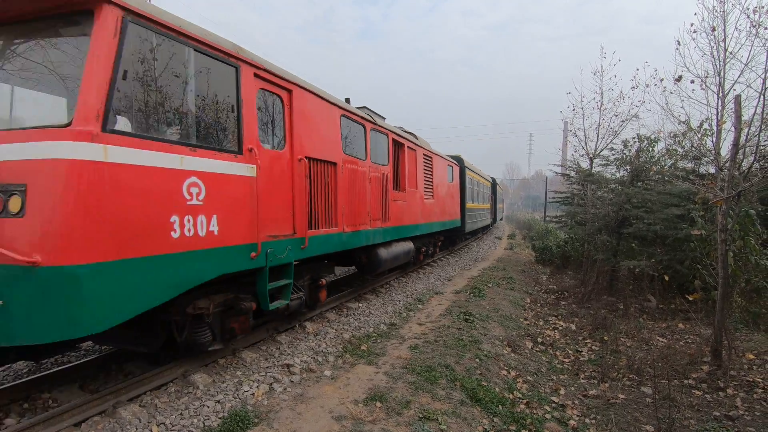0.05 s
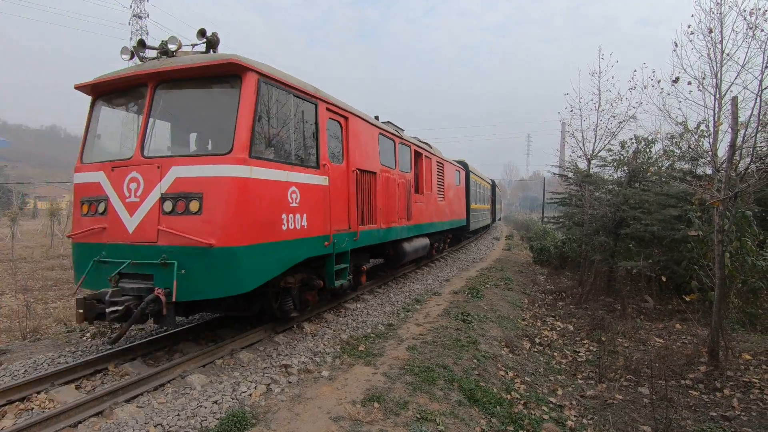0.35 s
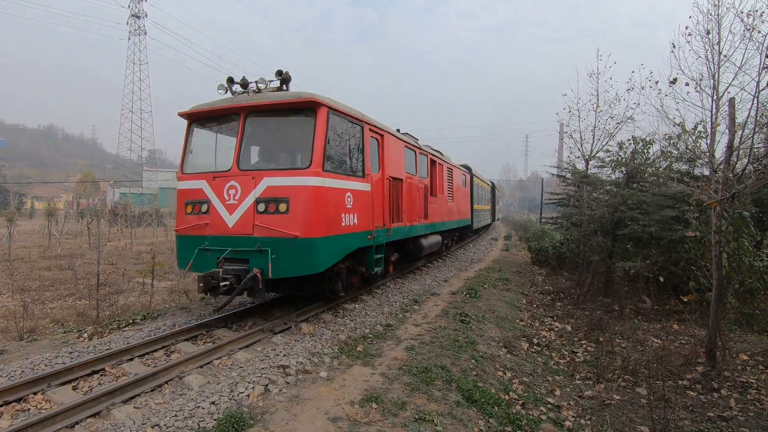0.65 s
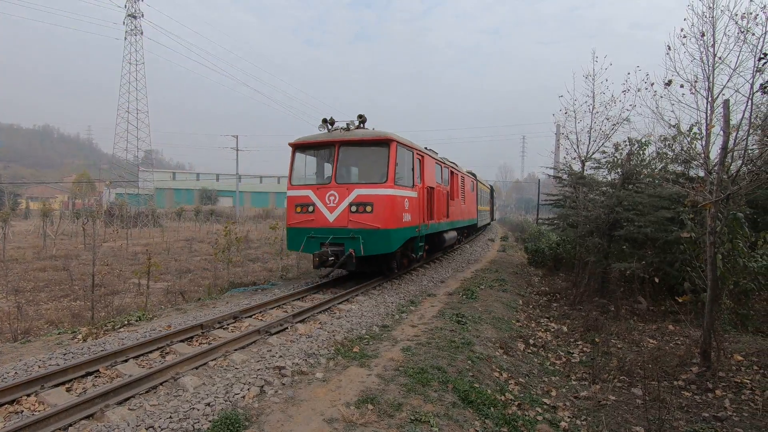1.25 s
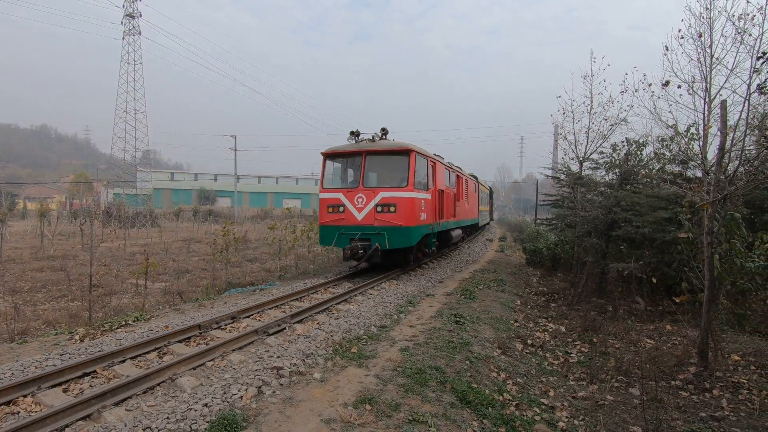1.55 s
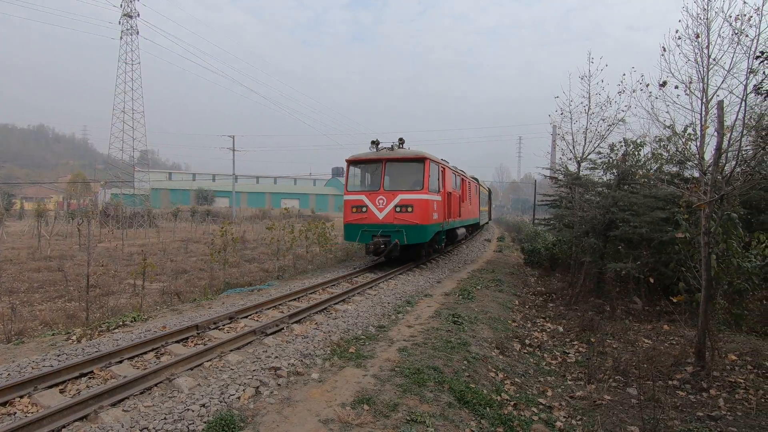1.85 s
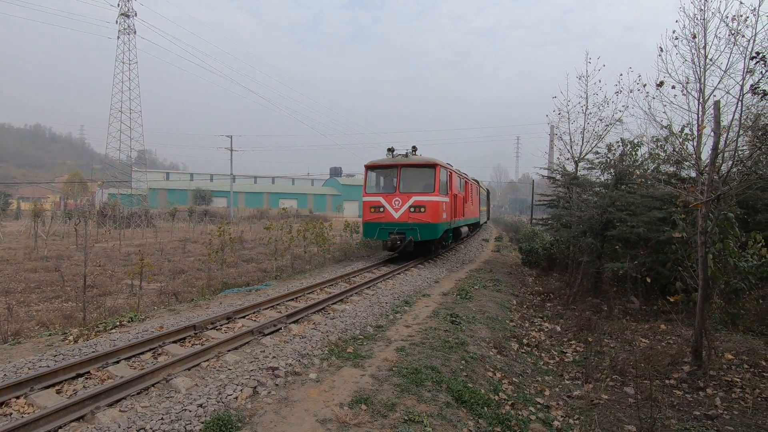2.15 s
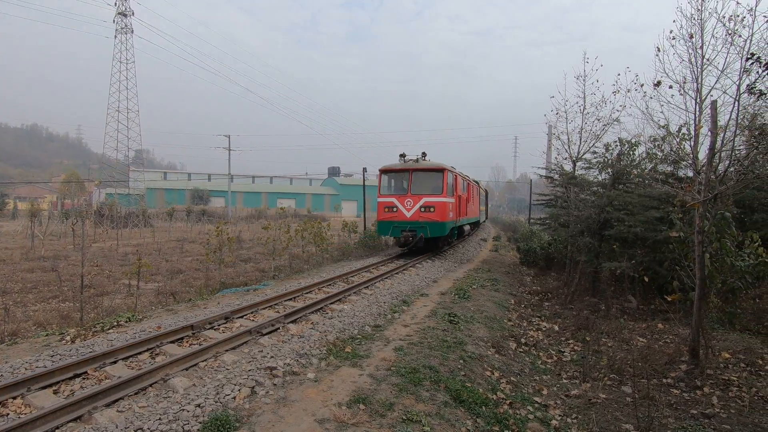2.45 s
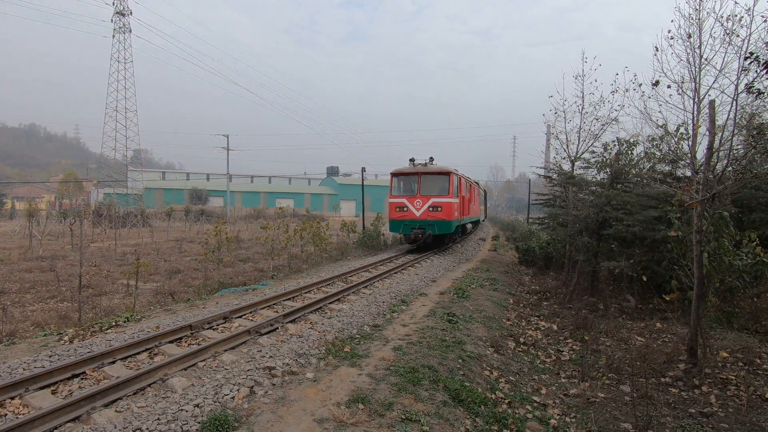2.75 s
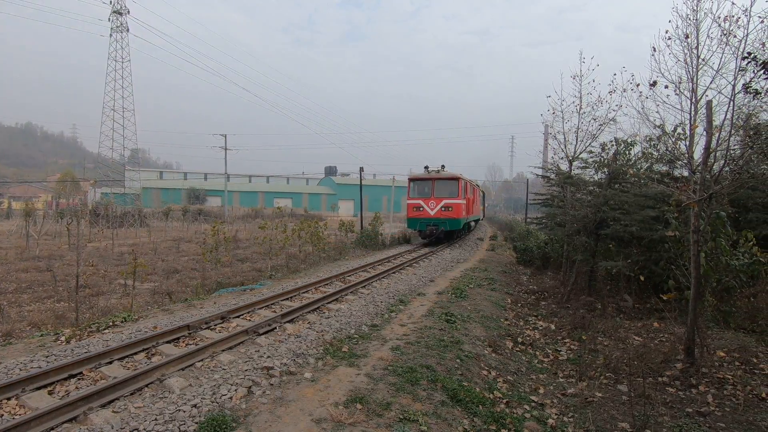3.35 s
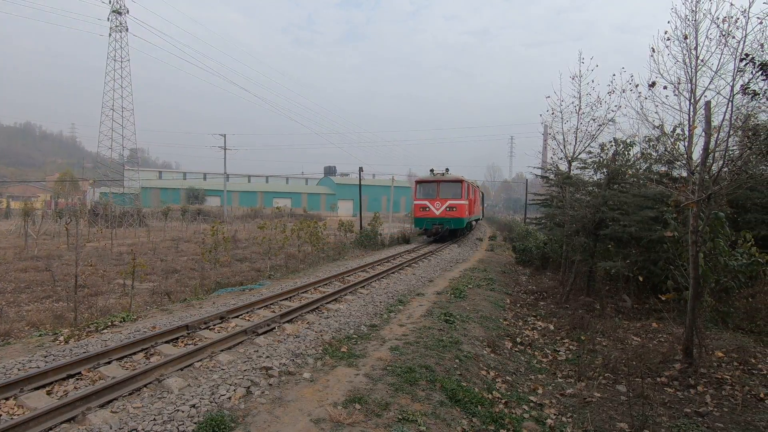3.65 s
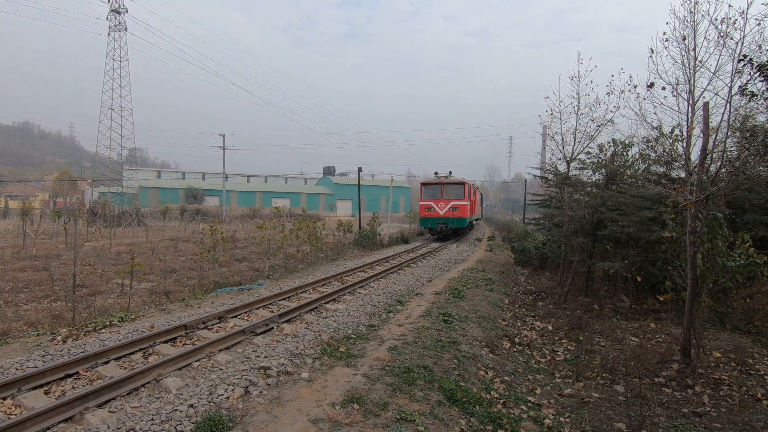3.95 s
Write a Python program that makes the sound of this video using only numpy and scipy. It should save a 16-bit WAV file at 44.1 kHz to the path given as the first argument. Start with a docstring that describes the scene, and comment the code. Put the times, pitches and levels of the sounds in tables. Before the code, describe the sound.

A diesel train rumbles and drones along a track, slowly fading as it moves away.

```python
"""A diesel locomotive backs its coaches away along a track in open country.
Its twelve cylinders fire in turn, so the exhaust drones and the engine clatters, with a few low booms.
Under it the running gear rumbles, and the roar and hiss of wheels on uneven rails fade with distance.
A wheel clanks over a rail joint, wheels rub the rail and sing briefly, and rubbing steel gives
a few faint, very high squeaks."""
import sys
import numpy as np
from scipy import signal
from scipy.fft import rfft, irfft
from scipy.io import wavfile

SR = 44100
rng = np.random.default_rng(int(sys.argv[2]) if len(sys.argv) > 2 else 0)


def master(y):
    """Save y as 16-bit WAV."""
    cut = np.clip(np.atleast_2d(y).T, -1, 1)
    pcm = np.round(cut * 32767)  # scale
    wavfile.write(sys.argv[1], SR, pcm.astype(np.int16))


N = 176400
TIME, FREQS = np.arange(N) / SR, np.fft.rfftfreq(N, 1 / SR)
CYLINDERS = 12


def exhaust(firings):
    """The exhaust drones: low, wavering tones that follow the engine's speed."""
    # For each tone: its vibrations per engine cycle (twelve firings), and its level in dB.
    orders = [9, 12, 18, 26, 28, 32]
    levels_db = [-32.5, -23, -34.5, -39, -37.5, -49.5]
    cycles = firings / CYLINDERS
    waver_db, out = 1.6, 0
    for order, db in zip(orders, levels_db):
        gain = from_db(db + waver_db * drift(2.5))
        out += np.sqrt(2) * gain * np.sin(2 * np.pi * (order * cycles + rng.random()))
    return out


def engine_clatter(firings):
    """Each cylinder repeats its own short knock once a cycle, and the knocks ring the engine's casing."""
    # How strong the cylinders' knocks are against each other, in dB, in firing order.
    cylinder_db = [5.5, -2, -2.5, 2.5, 3.5, 3, 5.5, 3.5, 2, 5, -2, -4.5]
    # The tone of the clatter. Each row: frequency in Hz, relative level in dB.
    spectrum = [(100, -20), (200, 3), (310, -2), (430, 0.5), (570, 1.5), (650, -3.5), (1000, -6.5),
                (1400, -11.5), (2400, -12.5), (3500, -39), (9000, -62)]
    # The casing's ring. Each row: pitch in Hz, width in Hz, level in dB against the clatter.
    casing = [(428.7, 85, -12), (512, 34, -11), (702, 11.5, -14.5)]
    fade_s, jitter_s, scatter_db = .091, .00012, .8
    fade = from_db(-60 * TIME[:SR // 10] / fade_s)
    knocks = rng.standard_normal((CYLINDERS, 2, len(fade))) * fade
    starts = np.flatnonzero(np.diff(np.floor(firings)))
    # No knock comes exactly on time or equally hard.
    late, harder = rng.standard_normal((N // 100, 2))[:len(starts)].T
    starts = np.clip(starts + (late * jitter_s * SR).astype(int), 0, N - 1)
    knocking = 0
    for cylinder, db in enumerate(cylinder_db):
        turns = slice(cylinder, None, CYLINDERS)
        clicks = np.zeros((1, N))
        clicks[0, starts[turns]] = from_db(db + scatter_db * harder[turns])
        knocking += signal.fftconvolve(clicks, knocks[cylinder], axes=1)[:, :N]
    ringing = sum(from_db(db) * resonate(knocking, hz, width) for hz, width, db in casing)
    return colour(knocking, spectrum) + ringing


def booms():
    """The locomotive gives brief low notes that swell and die, each with its octave."""
    # Each row: middle in seconds, length in seconds, pitch in Hz, level in dB, octave's level in dB.
    notes = [(0.272, 0.07, 185, -26.5, -38), (.62, .25, 118, -24, -42), (.76, 0.14, 180, -28, -33),
             (1.11, 0.3, 135, -22.5, -44)]
    out = 0
    for middle, length, hz, *levels in notes:
        for harmonic, db in enumerate(levels, 1):
            tone = np.sqrt(2) * np.sin(2 * np.pi * harmonic * hz * TIME)
            out += from_db(db) * swell(middle, length) * tone
    return out


def rolling(rumble_gain, roar_gain, hiss_gain):
    """Wheels roll on uneven rails: a deep rumble, a ringing roar and a hiss, all fluttering in level."""
    # The tone of each noise. Each row: frequency in Hz, relative level in dB.
    rumble_spectrum = [(12, -37), (22, -3.5), (35, -6), (62, 1), (85, -4), (110, -2), (135, -3.5),
                       (170, -10.5), (220, -19), (300, -27.5), (1200, -88)]
    roar_spectrum = [(100, -28), (260, 6.5), (480, 5.5), (680, 0), (1050, -1), (1700, -5.5), (2500, -8),
                     (3300, -15), (7000, -47), (12000, -68)]
    hiss_spectrum = [(1200, -21), (3000, 0.5), (4500, -0.5), (6300, 0.5), (7100, -6.5), (9000, -13),
                     (11000, -22.5), (13000, -28.5), (15500, -45)]
    rumble = noise(rumble_spectrum) * flutter(depth_db=.15, rate_hz=6)
    roar = noise(roar_spectrum) * flutter(depth_db=1, rate_hz=19) + wheel_ring()
    hiss = noise(hiss_spectrum) * flutter(depth_db=1, rate_hz=16)
    return rumble_gain * rumble + roar_gain * roar + hiss_gain * hiss


def wheel_ring():
    """Rolling wheels ring at a few pitches, each swelling and sinking on its own."""
    # Each row: pitch in Hz, width in Hz, level in dB against the roar.
    rings = [(1350, 23, -18), (1473, 75, -16), (1892, 120, -19.5), (3997, 260, -24)]
    return sum(from_db(db) * flutter(depth_db=1.5, rate_hz=13) * resonate(white(), hz, width)
               for hz, width, db in rings)


def nearest_wheels():
    """The nearest wheels make a bright rush that is soon too far away to hear."""
    # Each row: frequency in Hz, relative level in dB.
    spectrum = [(700, -36), (2200, -2), (2900, 2.5), (4000, -14), (12000, -38)]
    start_db, fade_db_per_s = -39.5, 11
    return from_db(start_db - fade_db_per_s * TIME) * noise(spectrum)


def rail_joint():
    """A wheel drops over a joint and bounces: the wheel clanks dully and the rail crashes brightly."""
    # Each row: start in seconds, clank level in dB, crash level in dB.
    blows = [(.436, -26, -42), (.451, -32, -35), (.47, -31, -43)]
    # The tone of each part. Each row: frequency in Hz, relative level in dB.
    clank_spectrum = [(200, 11.5), (950, 3), (2500, -8.5), (12000, -45)]
    crash_spectrum = [(800, -15), (2500, 0), (4800, 0), (15000, -42)]
    clank, crash = noise(clank_spectrum), noise(crash_spectrum)
    rise_s, fade_s, out = .003, .22, 0
    for start, clank_db, crash_db in blows:
        age = np.maximum(TIME - start, 0)
        envelope = np.minimum(age / rise_s, 1) * from_db(-60 * age / fade_s)
        out += envelope * (from_db(clank_db) * clank + from_db(crash_db) * crash)
    return out


def wheel_rubs():
    """A wheel rubs the rail and sings short, faint notes."""
    # Each row: middle in seconds, length in seconds, pitch in Hz, level in dB.
    notes = [(.86, .06, 1410, -40), (1.22, .22, 1997, -44), (1.44, .07, 1997, -45.5),
             (1.555, .045, 2006, -41.5), (2.275, .05, 1490, -41)]
    return sum(from_db(db) * swell(middle, length) * steel_tone(hz, wander_hz=26, rate_hz=70)
               for middle, length, hz, db in notes)


def squeaks():
    """Steel rubs in the running gear: thin chirps, each with a clashing overtone and a little rasp."""
    # Each row: middle and length in seconds, pitch in Hz, then tone, rasp and overtone levels in dB.
    chirps = [(.52, .13, 8880, -60, -62, -85), (.565, .11, 9780, -59.5, -63, -80),
              (1.985, .045, 9960, -59, -67, -77), (2.42, .11, 10980, -71, -63, -90),
              (2.492, .11, 8860, -63, -66, -90), (2.77, .075, 8840, -60, -68, -90),
              (3.67, .045, 9800, -63, -64, -82)]
    # Each row: frequency in Hz, relative level in dB.
    rasp_spectrum = [(4000, -29), (8800, 4), (11000, -3), (16000, -24)]
    rasp, out = noise(rasp_spectrum), 0
    for middle, length, hz, tone_db, rasp_db, overtone_db in chirps:
        tone, overtone = (steel_tone(f, wander_hz=65, rate_hz=160) for f in (hz, 1.42 * hz))
        chirp = from_db(tone_db) * tone + from_db(overtone_db) * overtone + from_db(rasp_db) * rasp
        out += swell(middle, length) * chirp
    return out


def steel_tone(hz, wander_hz, rate_hz):
    """A tone whose pitch trembles as steel sticks and slips."""
    pitch = hz + wander_hz * np.array([drift(rate_hz), drift(rate_hz)])
    return np.sqrt(2) * np.sin(2 * np.pi * np.cumsum(pitch, axis=1) / SR)


def microphones(sound):
    """Direct sound reaches two microphones alike, scattered sound with opposite signs."""
    # Each row: frequency in Hz, left minus right in dB, left's lead in radians, likeness from 0 to 1.
    left_and_right = [(200, -5, .08, .97), (430, -9.5, .25, .96), (590, -12, .8, .88),
                      (760, -7.5, 1.55, .88), (1050, -1.5, 1.4, .84), (2050, -2.5, .6, .78),
                      (2800, -7, 0, .55), (3120, -8, 1.7, .72), (4100, -6, 0, .77), (5100, -2, -1.4, .72),
                      (6100, -7, -2.2, .6), (7800, 4.5, -4.3, .58), (9400, 0, -6.4, .6)]
    balance_db, lead, alike = in_frequency(left_and_right)
    sides = np.array([[1], [-1]])
    direct, scattered = rfft(sound)
    pair = np.sqrt((1 + alike) / 2) * direct + sides * np.sqrt((1 - alike) / 2) * scattered
    # Their housing shades and delays one side against the other.
    shade = from_db(sides * balance_db / 2)
    pair *= shade / np.sqrt(np.mean(shade ** 2, axis=0))
    pair[0] *= np.exp(1j * lead)
    return irfft(pair, N)


def from_db(db):
    """Turn decibels into a gain."""
    return 10 ** (np.asarray(db) / 20)


def unit_power(x):
    """Scale to an average power of 1."""
    return x / np.sqrt(np.mean(x ** 2) + 1e-20)


def in_time(rows):
    """Turn a table's columns into curves over time."""
    seconds, *columns = np.transpose(rows)
    return [np.interp(TIME, seconds, column) for column in columns]


def in_frequency(rows):
    """Turn a table's columns into curves over log frequency."""
    hz, *columns = np.transpose(rows)
    return [np.interp(np.log(FREQS + 1), np.log(hz), column) for column in columns]


def colour(x, spectrum):
    """Shape a sound's lows and highs; the result has power 1."""
    return unit_power(irfft(rfft(x) * from_db(in_frequency(spectrum)[0]), N))


def white():
    """Two unrelated noises: the direct and the scattered sound."""
    return rng.standard_normal((2, N))


def noise(spectrum):
    """Noise with the given lows and highs."""
    return colour(white(), spectrum)


def drift(rate_hz):
    """A random curve of size about 1 that moves mostly slower than the rate."""
    smoothing = (FREQS > 0) / (1 + (FREQS / rate_hz) ** 2)
    return unit_power(irfft(rfft(rng.standard_normal(N)) * smoothing, N))


def flutter(depth_db, rate_hz):
    """A gain that wavers at random."""
    return from_db(depth_db * drift(rate_hz))


def resonate(x, hz, width_hz):
    """Make a sound ring at one pitch; the result has power 1."""
    r = np.exp(-np.pi * width_hz / SR)
    section = [1 - r, 0, r - 1, 1, -2 * r * np.cos(2 * np.pi * hz / SR), r * r]
    return unit_power(signal.sosfilt([section, section], x))


def swell(middle, length):
    """A smooth rise and fall around a moment."""
    return np.cos(np.pi * np.clip((TIME - middle) / length, -.5, .5))


def scene():
    """Engine and wheels draw away together."""
    # The engine's speed. Each row: time in seconds, firings per second.
    firing_rate = [(0, 91.46), (2.2, 93.06), (4, 93.31)]
    # Each row: time in seconds, then the levels of rumble, exhaust, clatter, roar and hiss in dB.
    levels = [(0, -20.5, -0.5, -28.5, -31.5, -39.5), (.3, -18.5, -3, -32.5, -30.5, -40.5),
              (.8, -21.5, -5.5, -34, -33.5, -42.5), (1.4, -22, -1, -33, -32, -44),
              (1.9, -21.5, -1, -34, -35, -46), (2.4, -21, -1.5, -39.5, -34, -46),
              (3, -23, -2, -42.5, -35.5, -48), (4, -21, -3, -41.5, -35.5, -50.5)]
    rumble_gain, exhaust_gain, clatter_gain, roar_gain, hiss_gain = from_db(in_time(levels))
    firings = np.cumsum(in_time(firing_rate)[0]) / SR  # how many so far
    train = rolling(rumble_gain, roar_gain, hiss_gain) + nearest_wheels()
    train += clatter_gain * engine_clatter(firings)
    train += rail_joint() + wheel_rubs() + squeaks()
    train[0] += exhaust_gain * exhaust(firings) + booms()  # direct sound only
    return microphones(train)


def record(dry):
    """Cut away the very highest treble."""
    cutoff_hz = 15600
    return signal.sosfilt(signal.cheby2(12, 70, cutoff_hz, fs=SR, output="sos"), dry)


dry = scene()
out = record(dry)
master(out)
```